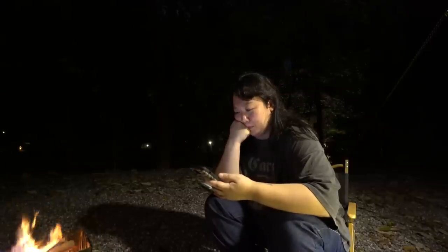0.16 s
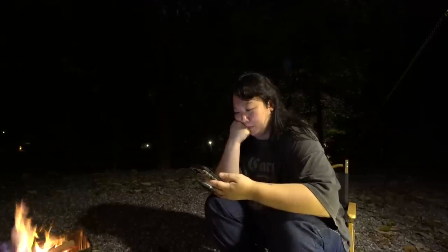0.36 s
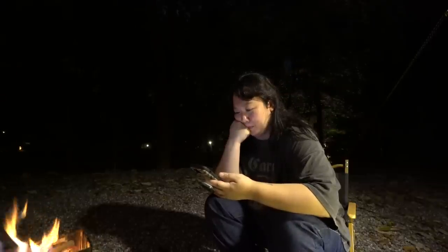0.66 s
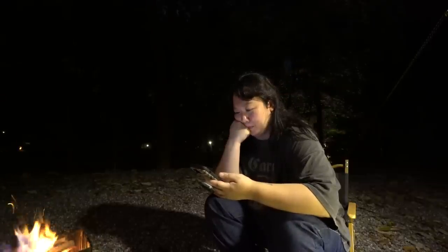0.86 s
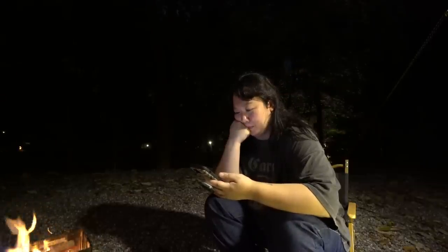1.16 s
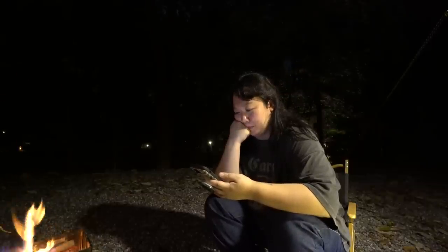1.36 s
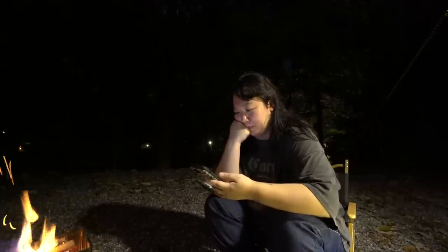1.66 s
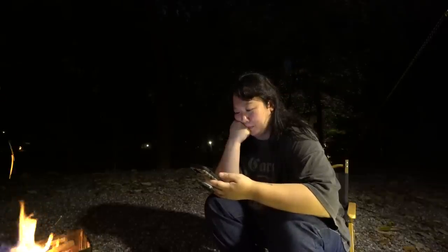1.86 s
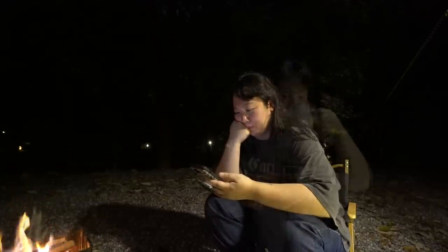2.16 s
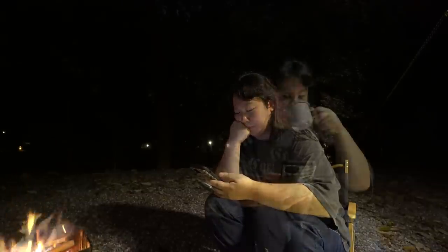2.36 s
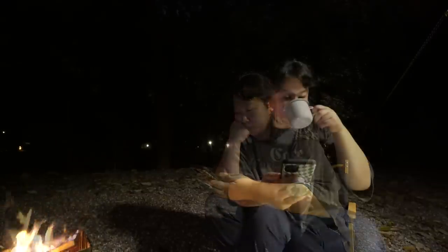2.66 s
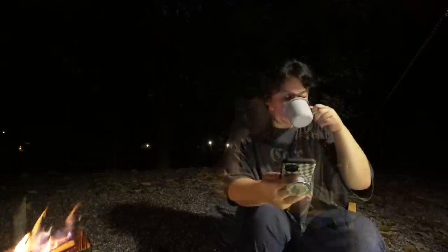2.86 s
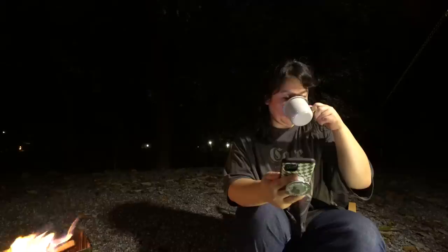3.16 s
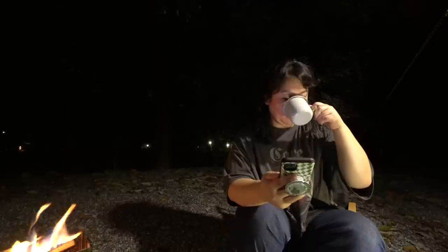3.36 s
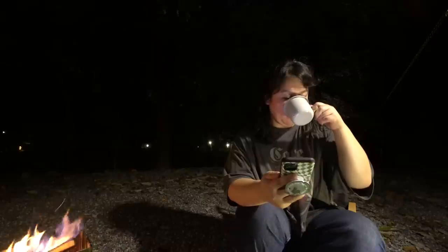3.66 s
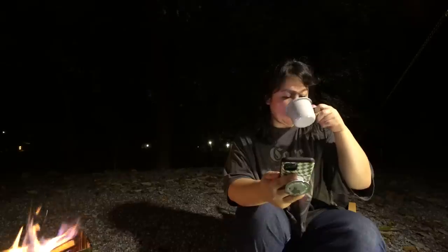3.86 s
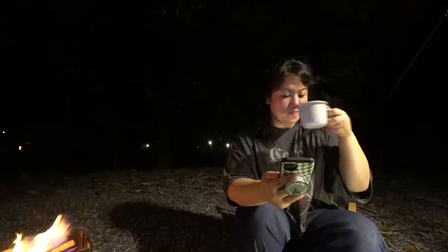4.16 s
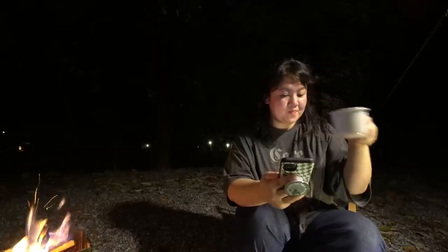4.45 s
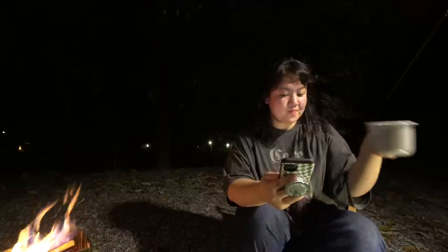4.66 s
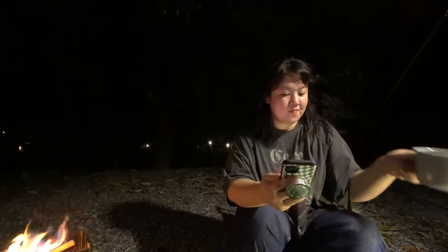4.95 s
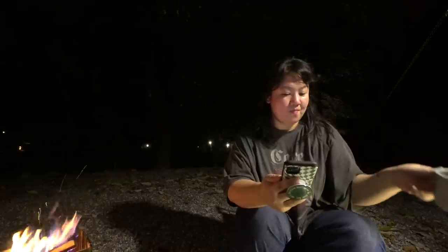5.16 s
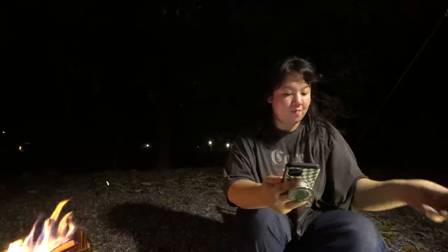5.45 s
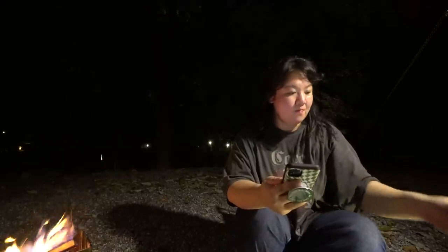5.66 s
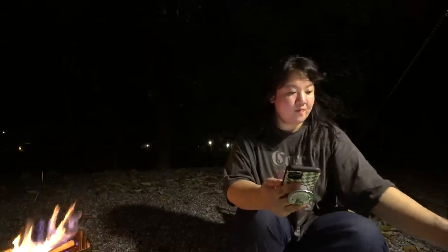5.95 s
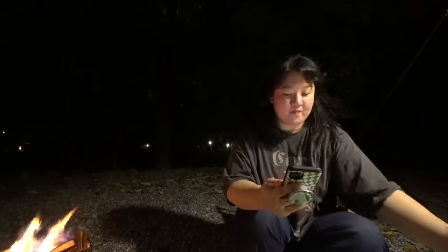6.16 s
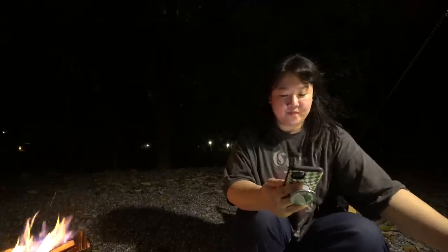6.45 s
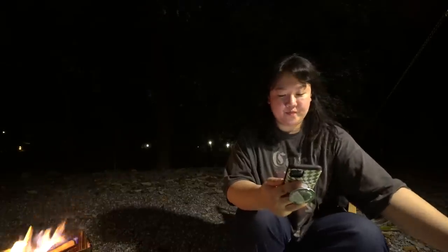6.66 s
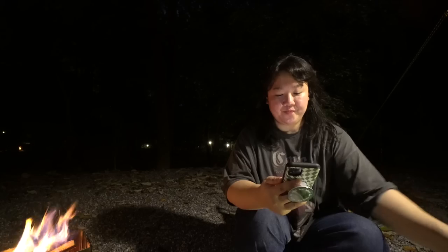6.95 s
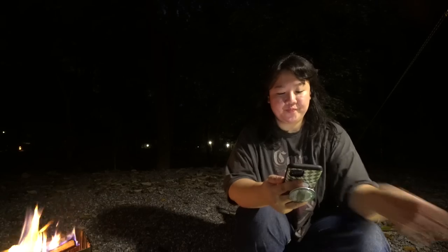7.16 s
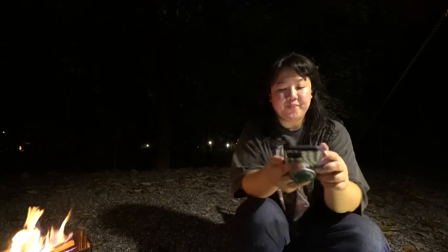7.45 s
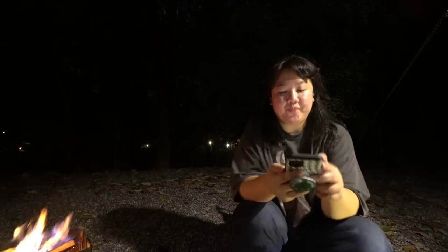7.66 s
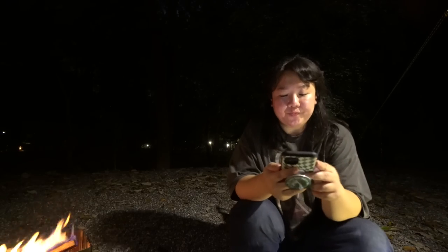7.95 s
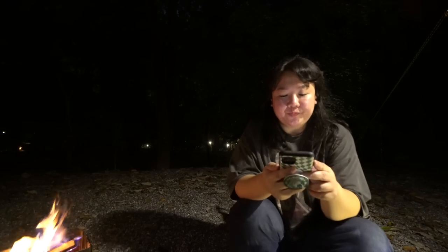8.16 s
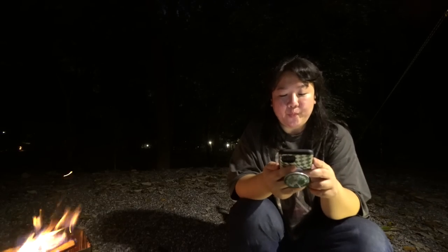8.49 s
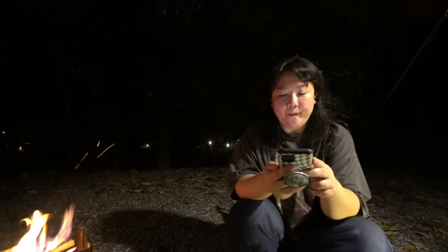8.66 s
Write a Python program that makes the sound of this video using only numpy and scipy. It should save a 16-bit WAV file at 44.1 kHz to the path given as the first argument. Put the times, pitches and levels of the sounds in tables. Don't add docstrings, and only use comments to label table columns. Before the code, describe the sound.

A close wood fire snaps with sharp, loud pops and ticks while crickets chirp and trill steadily and distant road traffic rumbles underneath.

```python
import sys
import numpy as np
from scipy import signal
from scipy.fft import rfft, irfft, next_fast_len
from scipy.io import wavfile

SR = 44100
rng = np.random.default_rng(int(sys.argv[2]) if len(sys.argv) > 2 else 0)


def to_wav(sig):
    pcm = np.clip(np.atleast_2d(sig), -1, 1) * 32767
    pcm = np.round(pcm).astype(np.int16)
    wavfile.write(sys.argv[1], SR, pcm.T)


def gain_from_db(level_db):
    decades = np.asarray(level_db, float) / 20
    return 10 ** decades


N = 388962


def rms_one(x):
    return x / np.sqrt(np.mean(x ** 2) + 1e-20)


def in_time(rows):
    s, *columns = np.transpose(rows)
    return [np.interp(np.arange(N) / SR, s, column) for column in columns]


def drift(rate_hz):
    r = np.exp(-80 * np.pi * rate_hz / SR)
    noise = rng.standard_normal(N // 40 + 2002)
    slow = signal.lfilter([1], [1, -2 * r, r * r], noise)[2000:]
    return np.interp(np.arange(N) / 40, np.arange(len(slow)), rms_one(slow))


def coloured(spectrum):
    hz, db = np.transpose(spectrum)
    size = next_fast_len(N)
    bins_hz = np.maximum(np.arange(size // 2 + 1) * SR / size, 1)
    gain = gain_from_db(np.interp(np.log(bins_hz), np.log(hz), db, left=-90))
    return rms_one(irfft(rfft(rng.standard_normal(size)) * gain, size)[:N])


def resonance(x, hz, width_hz):
    r = np.exp(-np.pi * width_hz / SR)
    zeros = np.array([1, 0, -1]) * (1 - r * r) / 2
    return signal.lfilter(zeros, [1, -2 * r * np.cos(2 * np.pi * hz / SR), r * r], x)


def add(out, start_s, sound):
    at = max(round(start_s * SR), 0)
    out[at:at + len(sound)] += sound[:N - at]


# start_s, ring_energy_db, ring_hz,
# body_energy_db, snap_energy_db
POPS = [(0.0237, 7, 4050, -26, 1), (0.3046, 11, 3740, -2, -11), (0.4516, 2, 3720, -2, -9),
        (0.6069, 13.5, 3400, 15, 4), (0.807, 5, 5340, -23, 5.5), (1.4486, 11.5, 3740, 4, -1),
        (1.9166, -1, 3950, -13.5, -5), (2.3795, 8.5, 3500, 0.5, 6), (3.0397, 1, 3700, 2.5, -11),
        (3.6956, 7, 3800, 3, -7), (5.016, 14, 3760, 9.5, 7), (5.6108, 10.5, 3750, 3, 6),
        (6.7366, 13, 3980, 2, -12), (7.8041, -5.5, 3670, -30, -5), (0.191, -23, 2690, -1.5, -30),
        (8.2195, -22, 4740, -23, -10)]
# start_s, ring_energy_db, ring_hz
CRACKS = [(0.5114, -11, 4280), (0.7, -11, 4760), (0.783, -3.5, 4360), (1.2087, -5, 3320),
          (1.389, -14, 3810), (1.7624, -5, 3720), (1.8348, -9, 4720), (2.3073, -9, 3600),
          (2.4358, -7, 3430), (4.295, -5, 3530), (4.3465, -6, 4120), (5.1667, -9, 3430), (2.405, -13, 5200),
          (3.722, -17, 5200), (5.038, -6, 5200), (6.228, -11, 3500)]
CRACK_BODY_DB, CRACK_SNAP_DB = -7, -7
BODY_PER_RING = .37
# delay_s, level_db
ECHOES = [
    (.0026, -13),
    (.0152, -15),
    (.025, -26),
]


def pops():
    out, thrown, t = np.zeros(N), np.zeros(N), np.arange(2000) / SR
    per_sample = 1 / np.sqrt(len(t))
    cracks = [(s, db, hz, db + CRACK_BODY_DB, db + CRACK_SNAP_DB) for s, db, hz in CRACKS]
    for start_s, ring_db, ring_hz, body_db, snap_db in POPS + cracks:
        depth = np.clip((body_db - ring_db + 13) / 11, 0, 1)

        body_hz = BODY_PER_RING * ring_hz
        body = -np.sin(2 * np.pi * body_hz * t) * np.exp(-t * body_hz * 3.2)

        slow_start = t - .00014 * depth * (1 - np.exp(-t / .00018))
        modes = np.sin(2 * np.pi * ring_hz * slow_start)
        modes += .7 * (1 - depth) * np.sin(2 * np.pi * 1.45 * ring_hz * t)
        ring = -modes * np.exp(-t / (.00068 - .00028 * depth))

        splinter_decay = np.exp(-t / .0014) + .05 * np.exp(-t / .013)
        splinters = rng.standard_normal(len(t)) * splinter_decay * np.minimum(t / .0003, 1)
        ring = rms_one(ring) + .35 * rms_one(resonance(splinters, ring_hz, 3500))

        pulse = -1. * (t == 0)
        snap = rms_one(resonance(pulse, 10500, 8000))
        snap += .55 * rms_one(resonance(splinters, 11500, 8000))

        sound = gain_from_db(body_db - 0.5) * rms_one(body)
        sound += gain_from_db(ring_db + 1.5) * rms_one(ring)
        sound += gain_from_db(snap_db - 3.0) * rms_one(snap)
        add(out, start_s - .0002, per_sample * sound)
        add(thrown, start_s - .0002, per_sample * sound * (.25 + .75 * depth))
    dull = resonance(thrown, 4100, 4000)
    for delay_s, level_db in ECHOES:
        add(out, delay_s, gain_from_db(level_db) * dull)
    return out


def crackle(per_s, level_db):
    sizes = gain_from_db(1.6 * np.minimum(rng.exponential(1, N), 4)) * rng.choice([-1, 1], N)
    ticks = sizes * (rng.random(N) < per_s / SR)
    return gain_from_db(level_db) * resonance(ticks + 1e-18, 5000, 7000)


# start_s, peak_db, t60_s
SPITS = [
    (6.225, -16, 0.33),
    (6.275, -30, 0.31),
    (6.413, -29, 0.15),
    (6.454, -26, 0.42),
    (7.39, -35, 0.33),
]
# centre_hz, width_hz, level_db
EMBER = [(760, 330, -4), (2100, 200, -1.5), (2760, 190, 0.5), (3460, 200, 0.5), (4940, 1600, -0.5),
         (10000, 13000, -8.5)]


def embers():
    swell, t = np.zeros(N), np.arange(SR // 2) / SR
    for start_s, peak_db, t60_s in SPITS:
        add(swell, start_s, gain_from_db(peak_db - 60 * t / t60_s) * np.minimum(t / .003, 1))
    grain_sizes = gain_from_db(5 * np.minimum(rng.exponential(1, N), 2.5))
    grains = .6 + grain_sizes * (rng.random(N) < .03)
    noise = rng.standard_normal(N) * gain_from_db(2.2 * drift(160)) * grains
    hiss = np.zeros(N)
    for k, (hz, width_hz, level_db) in enumerate(EMBER):
        hiss += (-1) ** k * gain_from_db(level_db) * rms_one(resonance(noise, hz, width_hz))
    return swell * rms_one(hiss)


# start_s, peak_db, pitch_hz
KNOCKS = [
    (3.478, -20, 880),
    (3.856, -18.5, 900),
    (7.746, -16, 540),
]


def knocks():
    out, t = np.zeros(N), np.arange(SR // 2) / SR
    for start_s, peak_db, hz in KNOCKS:
        envelope = (t / .0035) * np.exp(1 - t / .0035)
        add(out, start_s, gain_from_db(peak_db) * envelope * np.sin(2 * np.pi * hz * t))
    return out


UNEVEN_S, UNEVEN_DB = .002, 2.4


def notes(phrases, spacing_s, start_hz, end_hz, length_s):
    out, shape = np.zeros(N), np.linspace(0, 1, round(length_s * SR))
    for first_s, last_s, peak_db in phrases:
        count = round((last_s - first_s) / spacing_s) + 1
        for s in np.linspace(first_s, last_s, count):
            detune, turn, late, strong = rng.standard_normal(4)
            hz = (start_hz + (end_hz - start_hz) * shape ** 1.5) * (1 + .005 * detune)
            tone = np.sin(2 * np.pi * np.cumsum(hz) / SR + 3 * turn)
            stroke = gain_from_db(peak_db + UNEVEN_DB * strong) * np.sin(np.pi * shape) * tone
            add(out, s + UNEVEN_S * late - length_s / 2, stroke)
    return out


# first_note_s, last_note_s, peak_db
CHIRPS = [(2.46, 3.24, -33), (3.722, 4.524, -32), (5.124, 5.442, -32), (5.825, 6.403, -31),
          (6.775, 7.264, -31), (7.865, 8.76, -31.5)]
# first_note_s, last_note_s, peak_db
SWEEPS = [(3.334, 3.668, -31.5), (4.608, 5.038, -31.5), (5.533, 5.776, -30), (6.425, 6.75, -30.5),
          (7.305, 7.815, -31)]


def near_cricket():
    song = notes(CHIRPS, spacing_s=.0505, start_hz=3545, end_hz=3340, length_s=.028)
    song += gain_from_db(2) * notes(SWEEPS, spacing_s=.084, start_hz=3760, end_hz=3250, length_s=.046)
    for delay_s, level_db in [(.013, -16), (.037, -18)]:
        add(song, delay_s, gain_from_db(level_db) * song.copy())
    return song


# start_s, end_s, peak_db
QUICK_TRILLS = [(.32, .52, -33), (.62, .84, -33), (1.05, 1.22, -33), (1.46, 1.62, -33)]


def second_cricket():
    out, t = np.zeros(N), np.arange(N) / SR
    for start_s, end_s, peak_db in QUICK_TRILLS:
        short = t[:round((end_s - start_s) * SR)]
        swell = np.sqrt(np.sin(np.pi * short / (end_s - start_s)))
        strokes = np.maximum(np.sin(2 * np.pi * 42.5 * short), 0)
        add(out, start_s, gain_from_db(peak_db) * swell * strokes * np.sin(2 * np.pi * 3455 * short))
    strokes = np.maximum(np.sin(2 * np.pi * np.cumsum(19.5 + 1.46 * drift(1.97)) / SR), 0)
    tone = np.sin(2 * np.pi * np.cumsum(3487 + 8 * drift(10)) / SR)
    enters = np.clip((t - 2.3) / 0.52, 0, 1)
    return out + gain_from_db(-34.5 + 3.7 * drift(4.1)) * enters * strokes * tone


# start_s, length_s, teeth_per_s, level_db, wing_hz
BUZZES = [(.38, .61, 236, -48.5, 11650), (3.04, .6, 230, -49.5, 11450), (4.64, .57, 257, -47, 11600),
          (6.26, .54, 228, -46, 11900), (7.7, .56, 228, -46.5, 11700), (2.3, .48, 236, -55, 12050)]
ZIPS = [(.24, 0.16, 281, -57, 9900), (.98, 0.16, 295, -53, 10150), (1.47, 0.1, 288, -52, 10400),
        (1.95, .16, 284, -52.5, 10280), (7.15, 0.12, 304, -55, 11250), (7.97, .12, 286, -59, 10200)]
FAR_BUZZES = [(8.36, .18, 238, -55, 12000), (8.62, .2, 238, -56, 11250)]
# share_of_length, level_db, resonance_ratio
BUZZ_SHAPE = [(0, -13, 1.07), (.2, -3, 1.1), (.36, -2, 1.055), (.52, -.5, 1.005), (.88, -.5, .995),
              (1, -12, .99)]
ZIP_SHAPE = [(0, -9, 1.005), (.27, 3, 0.95), (.68, 0, 1.05), (1, -12, .99)]
FAR_SHAPE = [(0, -4, .955), (.6, -.5, 1.025), (1, -5, 1.035)]
WING_DECAY_S = [
    .00027,
    .00015,
    .0009,
]


def katydids():
    out, t = np.zeros(N), np.arange(N) / SR
    kinds = zip([BUZZES, ZIPS, FAR_BUZZES], [BUZZ_SHAPE, ZIP_SHAPE, FAR_SHAPE], WING_DECAY_S)
    for calls, shape, decay_s in kinds:
        share, shape_db, ratio = np.transpose(shape)
        for start_s, length_s, teeth_per_s, level_db, wing_hz in calls:
            on = (t >= start_s) & (t <= start_s + length_s)
            progress = (t[on] - start_s) / length_s
            db = level_db + np.interp(progress, share, shape_db)
            hz = wing_hz * np.interp(progress, share, ratio)
            teeth, since = np.divmod(t[on] * teeth_per_s, 1)
            since_s = since / teeth_per_s
            slip = .36 * rng.standard_normal(3000)[teeth.astype(int)]
            ring = np.sin(2 * np.pi * hz * since_s + slip)
            ring += .35 * np.sin(2 * np.pi * .93 * hz * since_s + slip)
            out[on] += gain_from_db(db) * rms_one(since_s * np.exp(-since_s / decay_s) * ring)
    out *= gain_from_db(2.0 * drift(30))
    direct = out.copy()
    for delay_s in rng.uniform(.001, .03, 6):
        add(out, delay_s, gain_from_db(-10) * direct)
    return out * gain_from_db(2.0)


# time_s, lag_strokes, peak_db
TRILL = [(0, -.26, -49), (.8, -.37, -41), (1.2, -0.48, -43.5), (1.6, -.61, -44), (2.2, -0.26, -47.5),
         (3.2, -0.74, -47), (4.0, -0.75, -46), (5.6, -0.69, -44), (7.0, -.54, -44), (7.6, -0.58, -44.5),
         (8.4, -0.45, -42), (8.82, -0.34, -42)]
TRILL_PER_S = 18.87


def high_cricket():
    lag, db = in_time(TRILL)
    cycle = (TRILL_PER_S * np.arange(N) / SR - lag + 0.26) % 1
    stroke = np.exp(-((cycle - .13) / .11) ** 2)
    stroke += gain_from_db(-2.5 + 1.4 * drift(11)) * np.exp(-((cycle - .45) / 0.21) ** 2)
    hz = 5862 - 70 * cycle + 12 * drift(8)
    tone = np.sin(2 * np.pi * np.cumsum(hz) / SR)
    rasp = .5 * rms_one(resonance(rng.standard_normal(N), 5780, 350))
    return gain_from_db(db + 3.0 + 1.6 * drift(30)) * stroke * (tone + rasp)


# centre_hz, width_hz, strokes_per_s, stroke_depth (0-1), level_db
VOICES = [
    (2626, 190, 72, 0.2, -43.5),
    (3600, 800, 69, 0.2, -34.5),
    (4558, 590, 89, 0.2, -33),
]


def chorus():
    out = np.zeros(N)
    for hz, width_hz, strokes_per_s, depth, level_db in VOICES:
        band = resonance(rng.standard_normal(N), hz, width_hz)
        band = resonance(band, hz, width_hz * 1.02)
        rate = strokes_per_s * (1 + 0.0425 * drift(2.7))
        strokes = 1 + depth * np.sin(2 * np.pi * np.cumsum(rate) / SR)
        out += gain_from_db(level_db - 3.5 + 1.26 * drift(10.6)) * rms_one(band * strokes)
    return out


# start_s, length_s, pitch_hz, peak_db
DRONES = [(0.38, 0.95, 131, -25), (1.36, 0.43, 132.5, -25), (1.71, 0.45, 132, -28), (2.07, 0.45, 131, -28),
          (.2, 3.3, 65, -34), (3.34, 0.78, 168, -31.5), (5.0, 1.06, 170.5, -37.5), (6.3, 0.7, 110, -38),
          (8.3, 0.57, 167.5, -30.5), (5.5, 2.6, 204, -37.5), (7.8, 0.79, 207, -34), (4.4, 11.7, 737, -46.5)]


def engines():
    out, t = np.zeros(N), np.arange(N) / SR
    waver = gain_from_db(1.2 * drift(5))
    wobble = np.cumsum(1.2 * drift(4)) / SR
    for start_s, length_s, hz, peak_db in DRONES:
        swell = np.sin(np.pi * np.clip((t - start_s) / length_s, 0, 1)) ** 1.08
        tone = np.sin(2 * np.pi * (hz * t + wobble * hz / 150))
        out += np.sqrt(2) * gain_from_db(peak_db) * swell * waver * tone
    return out


# time_s, level_db
TRAFFIC = [(0.0, -33), (1.4, -32.5), (2.85, -33.5), (3.14, -30.5), (3.44, -29.5), (3.95, -34), (4.35, -32),
           (5.72, -32), (6.16, -31.5), (6.36, -28.5), (6.88, -31), (7.27, -27.5), (7.59, -28.5),
           (7.76, -29.5), (8.06, -31), (8.82, -31)]
# frequency_hz, density_db (per Hz)
RUMBLE = [(12, -32), (20, -2), (65, 1), (157, -2.5), (203, -5), (312, -12.5), (600, -18), (780, -49),
          (1320, -120)]
ROAR = [(300, -7.5), (500, -12.5), (700, -1.5), (930, 5), (1200, -3), (1600, -10.5), (2200, -16.5),
        (3500, -22.5), (6000, -34)]
RUMBLE_DB, RUMBLE_FOLLOWS = -26.5, 0.45
UPPER_RUMBLE_S, UPPER_RUMBLE_DB = 2.5, -35.5


def traffic():
    roar_db, = in_time(TRAFFIC)
    rumble_db = RUMBLE_DB + RUMBLE_FOLLOWS * (roar_db - roar_db.mean())
    out = gain_from_db(rumble_db + 0.66 * drift(2.5)) * coloured(RUMBLE)
    out += gain_from_db(roar_db + 1.5 + 0.66 * drift(15)) * coloured(ROAR)
    arrives = np.clip((np.arange(N) / SR - UPPER_RUMBLE_S) / 0.79, 0, 1)
    upper_rumble = resonance(resonance(rng.standard_normal(N), 200, 186), 200, 186)
    return out + arrives * gain_from_db(UPPER_RUMBLE_DB + 1.7 * drift(2.6)) * rms_one(upper_rumble)


# frequency_hz, density_db (per Hz)
AIR = [(1500, -25), (2500, -13.5), (5500, 5.5), (7000, 4), (9000, 0), (12000, 5), (15500, 3.5)]


def night_air():
    return gain_from_db(-46) * coloured(AIR)


def scene():
    fire = pops() + crackle(per_s=20, level_db=-31) + embers() + knocks()
    insects = near_cricket() + second_cricket() + katydids() + high_cricket() + chorus()
    road = engines() + traffic()
    return (fire + insects + road + night_air())[None]


def roll_off(x):
    return signal.sosfilt(signal.butter(12, 16660, fs=SR, output="sos"), x)


def record(dry):
    low_pass = signal.cheby2(16, 40, 15900, fs=SR, output="sos")
    mix = np.clip(signal.sosfilt(low_pass, dry), -1, 1)
    return roll_off(mix)


dry = scene()
out = record(dry)
to_wav(out)
```